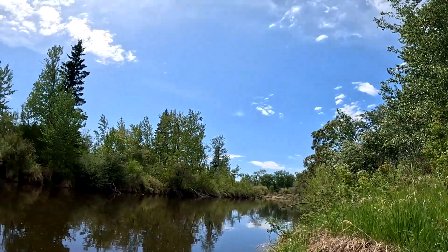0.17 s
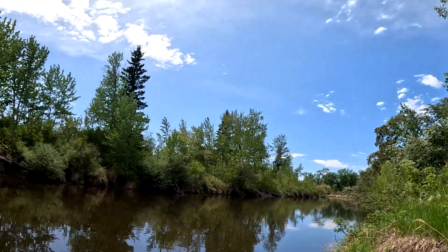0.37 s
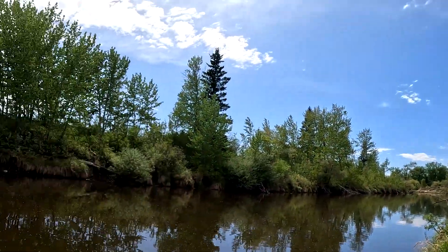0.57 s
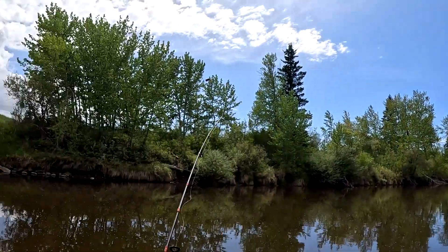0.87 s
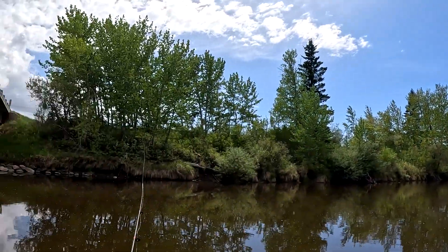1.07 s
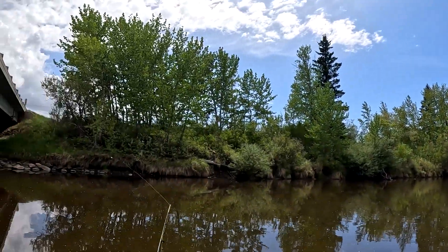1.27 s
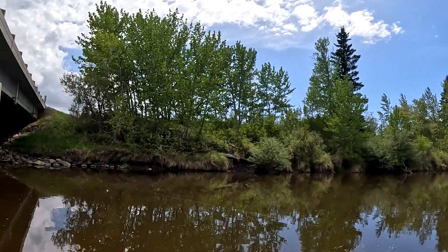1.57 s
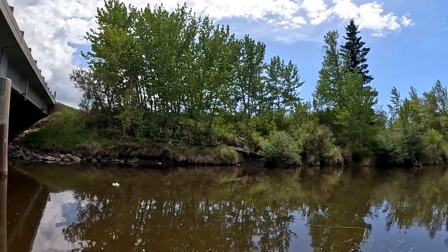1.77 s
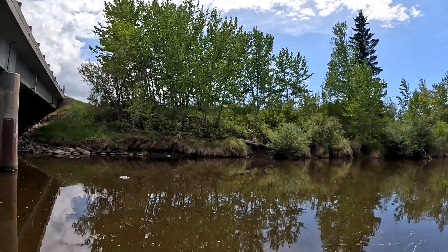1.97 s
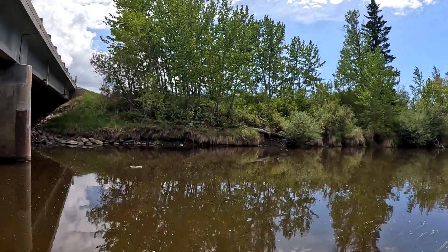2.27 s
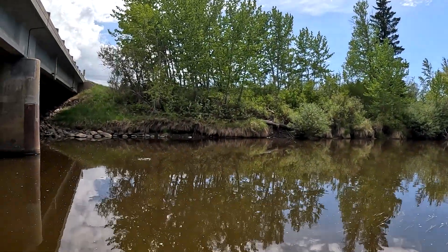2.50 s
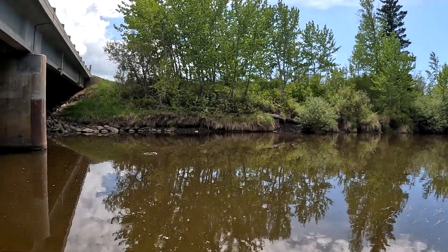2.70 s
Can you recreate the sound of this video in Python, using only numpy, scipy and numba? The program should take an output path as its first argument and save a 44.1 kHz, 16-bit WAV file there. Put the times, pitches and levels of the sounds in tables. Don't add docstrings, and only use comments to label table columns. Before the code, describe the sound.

A fishing rod swishes close by, line slaps and hisses off the spool, a hand fumbles, and the bail clacks loudly shut; low wind buffeting and distant road noise, outdoors on a riverbank, close camera microphone.

```python
import sys
import numpy as np
from scipy import signal
from scipy.fft import next_fast_len
from scipy.io import wavfile
from scipy.ndimage import uniform_filter1d
from numba import njit

SR = 44100
rng = np.random.default_rng(int(sys.argv[2]) if len(sys.argv) > 2 else 0)


def magnitude_from_level(level_db):
    exponent = np.asarray(level_db, float) / 20
    return 10 ** exponent


def transcribe(signal):
    frames = np.atleast_2d(signal).T
    limited = np.clip(frames, -1, 1)
    pcm = np.round(limited * 32767).astype(np.int16)
    wavfile.write(sys.argv[1], SR, pcm)


N = 125244
TIME = np.arange(N) / SR
SIDE = np.array([[1], [-1]])


def level(x, db):
    return x * magnitude_from_level(db) / np.sqrt(np.mean(x ** 2))


@njit
def svf(x, hz, width):
    y, b, l = np.empty(len(x)), 0., 0.
    for i in range(len(x)):
        g, k = np.tan(np.pi * hz[i] / SR), width / hz[i]
        v = (b + g * (x[i] - l)) / (1 + g * (g + k))
        b, l, y[i] = 2 * v - b, l + 2 * g * v, k * v
    return y


def band(x, hz, width_hz):
    hz = np.clip(hz + np.zeros(len(x)), 10, .45 * SR)
    once = svf(x, hz, 1. * width_hz)
    return svf(once, hz, 1. * width_hz)


def noise_band(hz, width_hz):
    return band(rng.standard_normal(N), hz, width_hz)


def walk(rate):
    k = int(SR / rate)
    steps = np.repeat(rng.standard_normal(N // k + 1), k)
    return 0.57 * uniform_filter1d(uniform_filter1d(steps, k), k)[:N]


def curve(rows, axis=1):
    rows = np.array(rows)
    return np.interp(TIME, rows[:, 0], rows[:, axis])


def gate(rows):
    return magnitude_from_level(curve(rows)) * (TIME > rows[0][0]) * (TIME < rows[-1][0])


def add(out, s, x):
    i = int(s * SR)
    out[i:i + len(x)] += x[:N - i]


def fade(t60, size=8000):
    t = np.arange(size) / SR
    return t, np.exp(-np.log(1000) * t / t60)


def grains(rate, spread_db):
    chance, sign, size = rng.random((3, N))
    clicks = (chance < rate / SR) * np.sign(sign - .5) * magnitude_from_level(-spread_db * np.log(size + .02))
    return clicks + 0.27 * rng.standard_normal(N)


# frequency in Hz, density in dB per Hz.
ROAD = [(80, -1.5), (200, -12), (400, -25.5), (600, -26), (1050, -17), (1900, -27.5), (5400, -40.5),
        (15000, -70)]
# frequency in Hz, side share in dB.
ROAD_SPREAD = [(60, -44), (110, -52), (200, -17.5), (380, -11), (700, -7), (1290, -8), (2380, -3),
               (4400, -5), (8120, -9), (15000, 10)]


def far_road():
    def at(rows, hz):
        rows = np.array(rows)
        return np.interp(np.log(hz), np.log(rows[:, 0]), rows[:, 1])

    out, swell_db = 0, 2 * walk(4.43)
    for hz in 80 * 2 ** (np.arange(23) / 3):
        mid, side = noise_band(hz, hz / 3), noise_band(hz, hz / 3)
        flicker_db = 0.5 * walk(6.9)
        gain = magnitude_from_level(at(ROAD, hz) + swell_db + flicker_db)
        out = out + gain * (mid + magnitude_from_level(at(ROAD_SPREAD, hz)) * side * SIDE)
    pan_db = 1.5
    return level(out, -46.5) * magnitude_from_level(pan_db / 2 * SIDE)


def hum():
    return level(noise_band(210, 6.6), -56.5)


# time in seconds, level in dB.
GUSTS = [(0.0, -48), (0.13, -50.5), (0.17, -42), (0.28, -42), (0.47, -31.5), (0.53, -43), (0.99, -45),
         (1.0, -49.5), (1.57, -40), (1.63, -46), (1.71, -43), (1.78, -49), (1.81, -44.5), (2.44, -52.5),
         (2.78, -41), (2.84, -45)]


def wind():
    low = signal.butter(2, 115, fs=SR, output="sos")
    mid, side = (level(signal.sosfilt(low, noise_band(34.5, 55)), 0) for _ in range(2))
    return magnitude_from_level(curve(GUSTS)) * (mid + magnitude_from_level(-10) * side * SIDE)


def leaves():
    mid, side = (level(noise_band(6940, 2300), -79.5) for _ in range(2))
    return magnitude_from_level(0.97 * walk(3.4)) * (mid + 0.52 * side * SIDE)


# time in seconds, pitch in Hz, level in dB.
BIRD_NOTES = [
    [(2.495, 4080, -85), (2.505, 4050, -71), (2.525, 3950, -70), (2.545, 3700, -74), (2.55, 3650, -88)],
    [(2.574, 4750, -85), (2.582, 4700, -70), (2.605, 4400, -69), (2.625, 4200, -69), (2.64, 4150, -67),
     (2.655, 3650, -71), (2.66, 3600, -88)],
]


def bird():
    out = 0
    for note in BIRD_NOTES:
        tone = np.sin(np.cumsum(2 * np.pi * curve(note) / SR))
        flutter_db = 4 + 5 * walk(60)
        out = out + magnitude_from_level(flutter_db) * gate(np.array(note)[:, ::2]) * tone
    return out


# start in seconds, peak in dB.
SWIVEL = [
    (2.331, -54),
    (2.728, -75),
]


def tinkle():
    out, hz = np.zeros(N), 14620
    t, ring = fade(0.051, size=16000)
    slow_ring = fade(0.35, size=16000)[1]
    ring = (ring + .12 * slow_ring) * magnitude_from_level(4 * walk(120)[:len(t)])
    tone = np.sin(2 * np.pi * hz * t) + .4 * np.sin(2 * np.pi * (hz + 90) * t)
    for s, db in SWIVEL:
        add(out, s, magnitude_from_level(db) * ring * tone)
    return out * (1 + SIDE)


# start in seconds, peak in dB, centre in Hz, width in Hz, t60 in seconds.
CAST_TICKS = [(.677, -44, 1300, 400, .03), (.746, -44, 800, 500, .02), (.78, -42, 1200, 700, .03),
              (.781, -46, 3200, 900, .04), (.7932, -31, 880, 500, .018), (0.807, -45, 2850, 300, .025),
              (.822, -47, 4500, 1500, .03), (.845, -48, 4500, 2500, .01),
              (0.885, -48.5, 9500, 4000, 0.0053), (.892, -50, 9000, 4000, .006),
              (1.7165, -35, 7000, 3500, 0.03), (1.718, -36, 1750, 500, .014), (1.719, -41, 2550, 300, .02),
              (1.724, -42, 1050, 400, .03), (1.729, -42, 3700, 1000, .03), (1.8027, -32, 1550, 900, 0.012),
              (1.8032, -37, 2750, 900, .012), (1.8035, -41, 4990, 350, .022), (1.817, -35, 1400, 450, 0.04),
              (1.82, -45, 7000, 2000, .03), (1.8318, -38, 410, 250, 0.13), (1.834, -44, 4500, 3000, .015),
              (1.835, -40, 1450, 500, .04), (1.841, -42, 3350, 400, .025), (1.8418, -40, 6900, 3000, 0.018),
              (1.8432, -45, 4760, 500, .016), (1.846, -45, 5800, 400, .025), (1.855, -45, 6500, 2500, .04),
              (1.8722, -48, 2700, 1500, .015), (1.886, -40, 1050, 500, 0.03), (1.897, -42, 1100, 500, .04),
              (1.972, -48.5, 2380, 314, .02)]
BAIL_TICKS = [(2.029, -43, 5500, 4500, 0.008), (2.041, -41, 4500, 5000, 0.014),
              (2.0463, -36, 5300, 900, .01), (2.0465, -37, 1800, 700, .015),
              (2.0555, -41, 12500, 4000, .03), (2.0565, -36, 1920, 450, 0.03),
              (2.062, -36, 7700, 1200, .025), (2.063, -52, 13000, 5000, .15), (2.078, -38, 1900, 400, .05),
              (2.0795, -44, 9500, 4000, .01), (2.086, -38, 1880, 400, .025), (2.101, -46, 7500, 4000, .04),
              (2.33, -57, 10500, 6000, .01), (2.331, -52, 4670, 1500, 0.0094),
              (2.414, -42, 5500, 5000, 0.004), (2.433, -49, 3000, 2500, 0.0036),
              (2.568, -59, 7500, 4000, .006), (2.715, -49, 4600, 2500, 0.004),
              (2.817, -54, 6800, 1500, 0.005), (2.818, -52, 2900, 900, .006)]


def ticks():
    out, rise_s = np.zeros(N), 0.0007
    for s, db, hz, width, t60 in CAST_TICKS + BAIL_TICKS:
        t, ring = fade(t60)
        burst = rng.standard_normal(len(t)) * ring * np.minimum(t / rise_s, 1)
        hit = band(burst, hz, width)
        add(out, s, hit * magnitude_from_level(db) / np.abs(hit).max())
    return out


# start in seconds, peak in dB, frequency in Hz, t60 in seconds.
HANDLE = [
    (0.791, -37, 320, 0.031),
    (1.804, -39, 64, 0.38),
    (1.805, -38, 210, 0.13),
    (1.869, -36, 158.2, 0.37),
    (1.9, -32.5, 202, 0.047),
    (1.95, -42.5, 302, 0.07),
    (2.059, -43.5, 457, 0.063),
]


def thumps():
    out = np.zeros(N)
    for s, db, hz, t60 in HANDLE:
        t, ring = fade(t60, size=16000)
        add(out, s, magnitude_from_level(db) * np.sin(2 * np.pi * hz * t) * ring)
    return out


# start in seconds, length in seconds, first pitch in Hz, last pitch in Hz, level in dB.
GLIDES = [
    (.706, .036, 480, 1300, -43),
    (.808, .022, 950, 1500, -49),
    (.655, .05, 3450, 3650, -61),
    (1.125, .125, 4250, 5600, -62),
    (1.315, .055, 4300, 5100, -59),
    (1.83, .05, 250, 480, -46),
]


def whistles():
    out = np.zeros(N)
    for s, length, hz0, hz1, db in GLIDES:
        n = int(length * SR)
        swell = np.sqrt(np.hanning(n)) * magnitude_from_level(4.0 * walk(220)[:n])
        wobble = 0.092 * walk(350)[:n] * min(1, 700 / hz0)
        hz = np.geomspace(hz0, hz1, n) * (1 + wobble)
        add(out, s, magnitude_from_level(db) * swell * np.sin(np.cumsum(2 * np.pi * hz / SR)))
    return out


def rustle(rows, body, rate):
    out = 0
    for hz, width, db in body:
        out = out + magnitude_from_level(db) * level(band(grains(rate, 1.86), hz, width), 0)
    return gate(rows) * level(out, 0)


# time in seconds, level in dB.
SWISH = [(.45, -91), (.64, -61), (.67, -55.5), (.74, -54), (.81, -48.5), (.87, -53), (.93, -59.5),
         (1.0, -89)]
# centre in Hz, width in Hz, level in dB.
SWISH_BODY = [(540, 440, -4.5), (940, 1200, -1.5), (3160, 3300, -4), (6750, 4800, -9)]


def swing():
    return rustle(SWISH, SWISH_BODY, 3300)


# time in seconds, level in dB.
SLEEVE = [(1.68, -88), (1.72, -50), (1.77, -52), (1.84, -49.5), (1.94, -59.5), (2.03, -55.5), (2.1, -51),
          (2.22, -55.5), (2.35, -69)]
# centre in Hz, width in Hz, level in dB.
SLEEVE_BODY = [(404, 730, 1), (1190, 1160, 5), (2480, 2100, -4), (4030, 4000, -1), (6900, 3300, -5.5),
               (14000, 5000, -31)]


def hand():
    return rustle(SLEEVE, SLEEVE_BODY, 1200)


# time in seconds, level in dB, line speed from 0 to 1.
LINE_RUN = [(.92, -68, 0.), (.945, -46.5, 0.31), (.98, -49.5, 0.85), (1.07, -49.5, 1), (1.1, -52, 0.33),
            (1.19, -51, 0.88), (1.28, -53, 0.17), (1.35, -51, 1), (1.39, -53, 0.14), (1.46, -53.5, 0.46),
            (1.5, -51.5, 0.9), (1.6, -53, 0.37), (1.68, -53, 0.67), (1.75, -55, 0.1), (1.78, -78, 0.2)]
# centre in Hz, width in Hz, level in dB.
ROD_RINGS = [(2950, 1800, -10.5), (4920, 3000, -6.5), (7320, 2000, -5), (9460, 1400, -6),
             (12100, 3000, -18), (14000, 3400, -15.5)]


def line():
    def slap():
        return grains(900, 3.2)

    slow_hz, fast_hz = 5960, 9730
    hz = slow_hz + (fast_hz - slow_hz) * curve(LINE_RUN, axis=2) + 250 * walk(39.0)
    hiss = level(band(slap(), hz, 3500), 0)
    undertone = level(band(slap(), hz / 2, 500), -21)
    rub = 0
    for ring_hz, width, db in ROD_RINGS:
        rub = rub + magnitude_from_level(db + 2.2 * walk(25.6)) * level(band(slap(), ring_hz, width), 0)
    snags_per_s = 200
    snags = (rng.random(N) < snags_per_s / SR) * np.clip(rng.standard_normal(N), -1.5, 1.5)
    rub = rub + level(band(snags, 4600, 4300), -15)
    tight = np.clip((TIME - LINE_RUN[0][0]) / 0.051, 0, 1) ** 2
    sound = hiss + undertone + rub * tight
    coils_per_s = 16 * (1 + 0.051 * walk(3.2))
    throb_db = np.sin(np.cumsum(2 * np.pi * coils_per_s / SR))
    return level(sound, 0) * gate(LINE_RUN) * magnitude_from_level(throb_db)


# frequency in Hz, level in dB, t60 in seconds.
REEL_MODES = [(973, -11.5, 0.036), (1173, -9.5, 0.041), (1920, -4.5, 0.058), (2510, -10, 0.069),
              (3000, -2, 0.012), (3490, -1, 0.014), (3920, 1.5, 0.014), (4300, -2, 0.017),
              (5050, -12, 0.038), (6440, -5, 0.0085), (6700, -3.5, 0.02), (7670, -2, 0.023),
              (8360, -16.5, 0.018), (9500, -7, .02)]
# start in seconds, peak in dB.
BAIL_BLOWS = [(2.053, -34), (2.0556, -15.5), (2.0556, -18.5), (2.0558, -3.5), (2.0569, -15.5),
              (2.0581, -24.5), (2.06, -30), (2.0606, -21), (2.0615, -24), (2.063, -31), (2.0646, -25),
              (2.0642, -23), (2.0658, -31), (2.077, -30), (2.0776, -23), (2.0805, -31), (2.0841, -30),
              (2.086, -36), (2.088, -32), (2.0886, -35)]
# centre in Hz, width in Hz, share taken out from 0 to 1.
FOOT_DIPS = [(2350, 600, .55), (5250, 1900, .8)]


def reel():
    out, contact_s = np.zeros(N), 0.00033
    crack = fade(0.0014, size=3000)[1]
    for s, db in BAIL_BLOWS:
        hit, loose = 0, db / 40
        for hz, mode_db, t60 in REEL_MODES:
            vary_level, vary_pitch, vary_phase = rng.standard_normal(3)
            t, ring = fade(t60, size=3000)
            rise = np.sin(np.pi / 2 * np.minimum(t / contact_s, 1)) ** 2
            shape = (crack + magnitude_from_level(-29.5) * ring) * rise
            cycles = hz * (1 + 0.019 * vary_pitch) * t + vary_phase * loose
            hit = hit + magnitude_from_level(mode_db + 4 * vary_level * loose) * np.sin(2 * np.pi * cycles) * shape
        add(out, s, hit * magnitude_from_level(db) / np.abs(hit).max())
    for hz, width, share in FOOT_DIPS:
        out = out - share * svf(out, np.full(N, 1. * hz), 1. * width)
    return signal.sosfilt(signal.butter(4, [920, 10100], "band", fs=SR, output="sos"), out)


def scene():
    back = far_road() + hum() + wind() + leaves() + bird()
    near = ticks() + thumps() + whistles() + swing() + hand() + line() + reel()
    mic_top = signal.butter(2, 10400, fs=SR, output="sos")
    near = signal.sosfilt(mic_top, near)
    shifted = signal.hilbert(near, next_fast_len(N)).imag[:N]
    side = magnitude_from_level(-13) * shifted + 0.041 * near
    tails = rng.standard_normal((2, 12000)) * fade(0.24, size=12000)[1]
    tails = tails * magnitude_from_level(-18) / np.sqrt((tails ** 2).sum(axis=1, keepdims=True))
    wet = signal.fftconvolve(near[None], tails, axes=1)[:, :N]
    return near + side * SIDE + wet + tinkle() + back


def low_pass(x):
    return signal.sosfilt(signal.butter(12, 15640, fs=SR, output="sos"), x)


def record(dry):
    return low_pass(dry)


dry = scene()
out = record(dry)
transcribe(out)
```